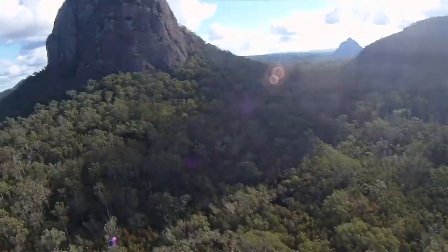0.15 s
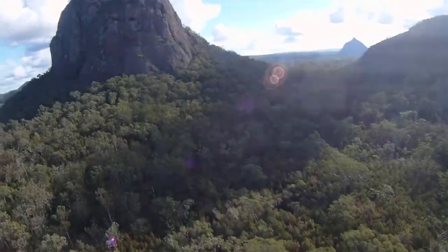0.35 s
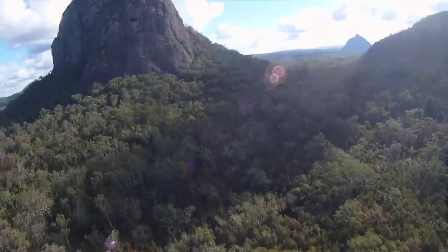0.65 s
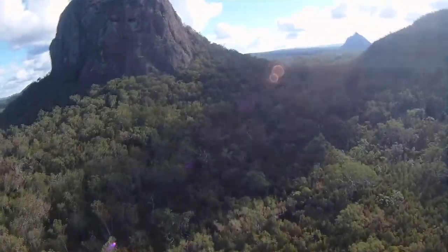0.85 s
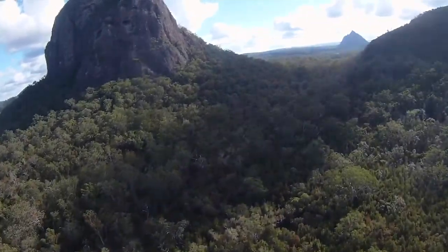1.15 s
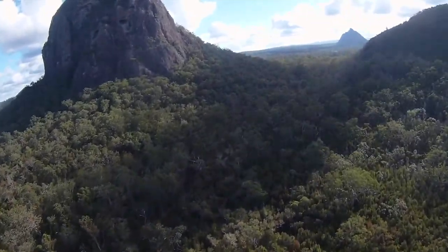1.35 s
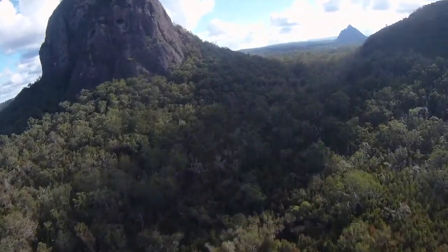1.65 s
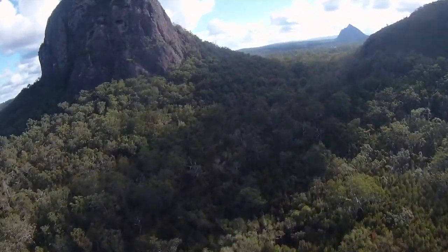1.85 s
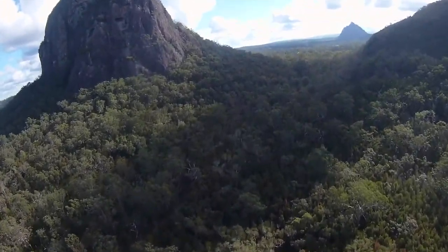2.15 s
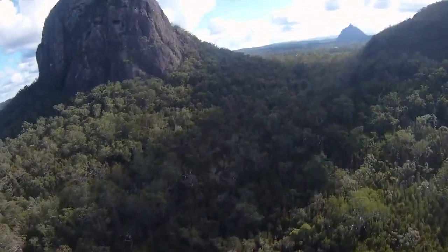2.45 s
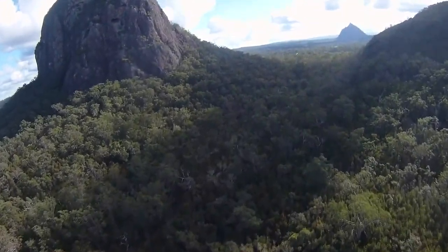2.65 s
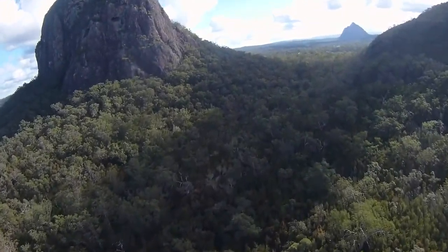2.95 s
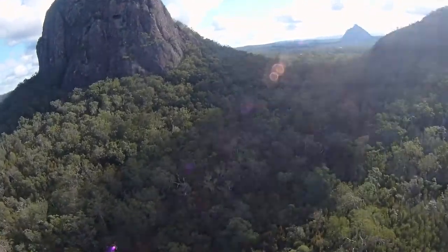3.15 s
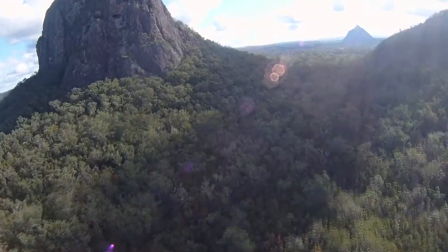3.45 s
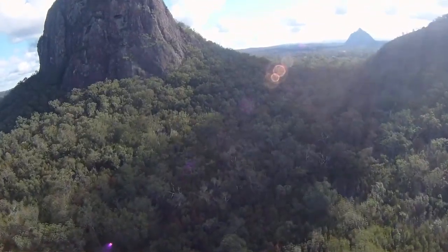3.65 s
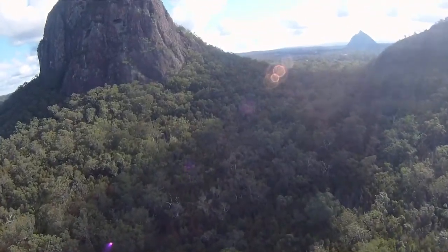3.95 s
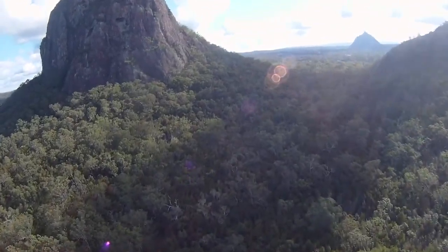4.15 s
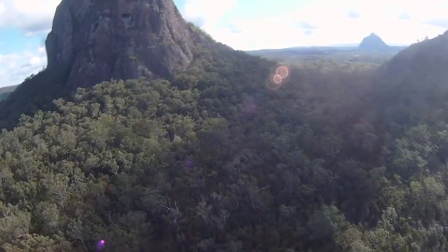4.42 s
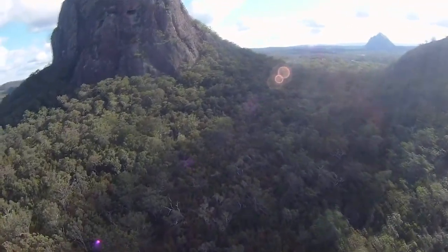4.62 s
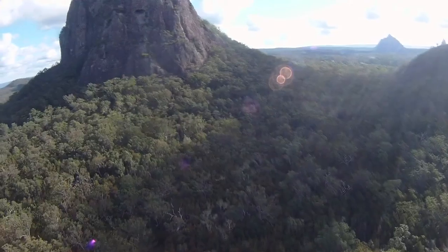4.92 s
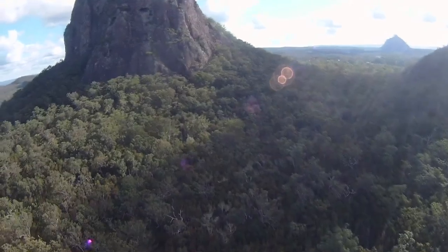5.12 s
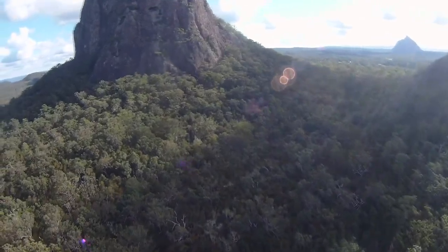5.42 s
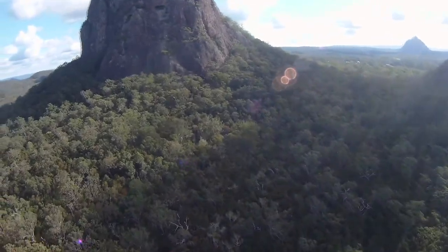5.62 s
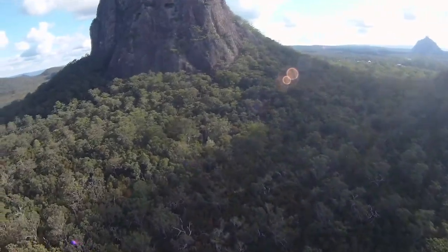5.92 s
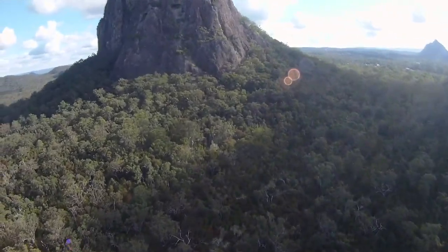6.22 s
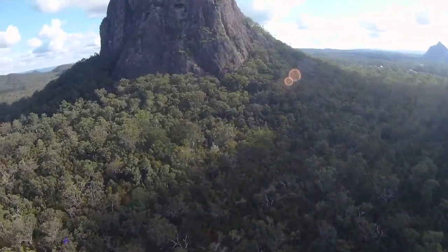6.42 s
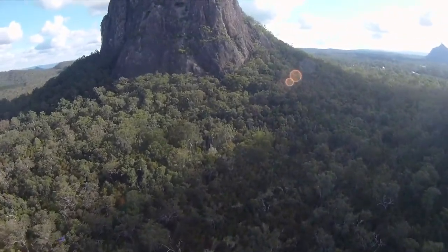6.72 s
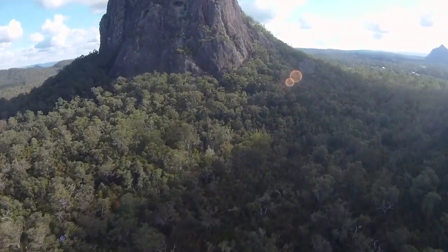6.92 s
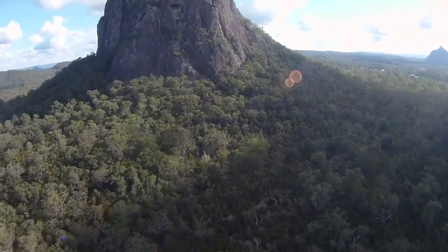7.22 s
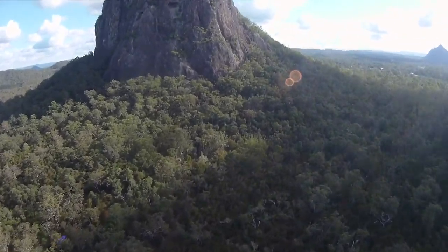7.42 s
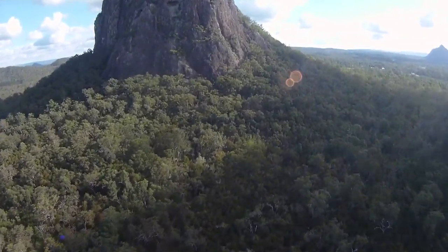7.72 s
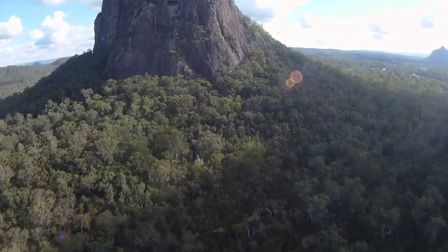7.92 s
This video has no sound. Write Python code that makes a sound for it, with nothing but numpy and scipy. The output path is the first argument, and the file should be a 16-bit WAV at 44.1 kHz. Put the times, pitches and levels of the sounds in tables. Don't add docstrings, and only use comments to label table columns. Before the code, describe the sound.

Heard from the aircraft itself, several slightly mistuned rotors hum thickly and waver without pause, wrapped in boxy growl, wind rumble and faint thin whistles.

```python
import sys
import numpy as np
from scipy import signal
from scipy.fft import rfft, irfft, next_fast_len
from scipy.io import wavfile
from scipy.ndimage import uniform_filter1d

SR = 44100
rng = np.random.default_rng(int(sys.argv[2]) if len(sys.argv) > 2 else 0)


def unload_audio(sound):
    columns = np.transpose(np.atleast_2d(sound))
    steps = np.round(np.clip(columns, -1, 1) * 32767)
    wavfile.write(sys.argv[1], SR, steps.astype(np.int16))


def gain_from_decibels(decibels):
    exponent = np.asarray(decibels, float) / 20
    return 10 ** exponent


N = 355887
TIME_S = np.arange(N) / SR


def rms_one(x):
    return x / np.sqrt(np.mean(x ** 2) + 1e-20)


def in_time(rows):
    start_s, *columns = np.transpose(rows)
    return [np.interp(TIME_S, start_s, column) for column in columns]


def phase_of(hz):
    return 2 * np.pi * np.cumsum(hz) / SR


def drift(rate):
    pole = np.exp(-80 * np.pi * rate / SR)
    noise = rng.standard_normal(N // 40 + 2002)
    slow = signal.lfilter([1], [1, -2 * pole, pole * pole], noise)[2000:]
    return np.interp(np.arange(N) / 40, np.arange(len(slow)), rms_one(slow))


def swells(rows, width_s):
    t = np.arange(0, N, 64) / SR
    db = sum(level_db * np.exp(-.5 * ((t - centre_s) / width_s) ** 2) for centre_s, level_db in rows)
    return np.interp(TIME_S, t, db)


def spectrum_gain(hz_offset_log, spectrum):
    hz, db = np.transpose(spectrum)
    return gain_from_decibels(np.interp(hz_offset_log, np.log(hz), db, left=-120, right=-120))


def coloured(x, spectrum, reference=None):
    size = next_fast_len(N)
    log_hz = np.log(np.arange(size // 2 + 1) * SR / size + 1)
    gain = spectrum_gain(log_hz, spectrum)
    scale = spectrum_gain(log_hz, reference or spectrum)
    return irfft(rfft(rms_one(x), size) * gain, size)[:N] / np.sqrt(np.mean(scale ** 2))


# start_s [s], first to fifth speed [turns per s]
NEAR_SPEEDS = [(0.0, 104.121, 103.653, 112.072, 107.02, 102.714),
               (0.47, 103.821, 104.185, 112.67, 105.39, 102.751),
               (0.95, 104.685, 104.106, 112.592, 108.604, 105.806),
               (1.42, 107.885, 107.047, 111.902, 110.497, 106.969),
               (1.9, 108.092, 108.946, 112.958, 111.492, 105.987),
               (2.37, 108.79, 109.642, 113.694, 110.26, 108.015),
               (2.85, 108.917, 109.418, 114.127, 109.79, 106.468),
               (3.32, 108.599, 107.68, 114.051, 110.108, 107.365),
               (3.8, 109.15, 110.447, 115.444, 111.512, 106.646),
               (4.27, 109.647, 110.388, 114.233, 114.747, 106.241),
               (4.75, 109.916, 108.352, 114.262, 113.744, 106.401),
               (5.22, 109.907, 109.022, 114.772, 113.455, 108.02),
               (5.7, 111.31, 111.021, 116.039, 112.189, 108.966),
               (6.17, 108.612, 110.534, 114.553, 113.175, 107.009),
               (6.65, 108.468, 107.394, 116.269, 112.237, 107.478),
               (7.12, 109.687, 110.408, 115.178, 110.672, 107.557),
               (7.6, 110.897, 110.804, 116.991, 113.959, 109.037),
               (8.07, 109.435, 109.111, 115.446, 110.31, 110.235)]
# start_s [s], speed [turns per s]
FAR_SPEED = [(0, 116), (.8, 116.6), (1.4, 117.8), (2.5, 119.1), (3.3, 118.4), (3.8, 120.3), (5.3, 120.1),
             (6.6, 118.8), (7.5, 120.1), (8.07, 119.8)]
START_ANGLES = [(0, 0), (.976, .494), (.239, .811), (.733, .689), (.402, .536), (0, 0)]


def rotor_angles():
    speeds = in_time(NEAR_SPEEDS) + in_time(FAR_SPEED)
    return [phase_of(turns) + 2 * np.pi * start for turns, (start, _) in zip(speeds, START_ANGLES)]


def hunting(angles, hunt):
    return [angle + phase_of(hunt * drift(7.64)) for angle in angles]


# shake_db [dB], blade_db [dB]
HUM_DB = [(-33.5, -10.5), (-31, -20.5), (-31, -23), (-29.5, -23.5), (-33.5, -26), (-37, -34)]
# centre_s [s], level_db [dB]
ROCKING = [(.3, -6), (.72, 4.5), (1.2, -3.5), (2.1, 2), (2.32, -7), (2.75, -5), (2.98, -9), (3.1, 2),
           (3.45, 7.5), (3.75, 4.5), (4.12, 5.5), (4.68, -9.5), (5.0, 1.5), (5.75, 5), (6.0, -5),
           (6.6, -0.5), (6.87, 3), (7.05, -7), (7.35, -2.5), (7.72, 3.5), (7.92, 0)]
# centre_s [s], level_db [dB]
WAKES = [(.19, -3.5), (.42, -2.5), (2.12, -4), (3.28, -7), (3.75, -2.5), (4.1, -6), (4.37, -5.5),
         (4.89, -8.5), (4.94, -5.5), (5.55, -4), (5.88, -5), (6.17, 0.5), (6.23, -5.5), (7.11, -6),
         (8.05, -5)]


def hum(angles, flutter_db):
    rocking = gain_from_decibels(swells(ROCKING, width_s=0.047))
    wake = gain_from_decibels(swells(WAKES, width_s=0.0078))
    out = np.zeros(N)
    for angle, (_, heavy), (shake_db, blade_db) in zip(angles, START_ANGLES, HUM_DB):
        shake = gain_from_decibels(shake_db) * rocking * np.cos(angle + 2 * np.pi * heavy)
        blade = gain_from_decibels(blade_db) * wake * np.cos(2 * angle)
        out += np.sqrt(2) * gain_from_decibels(flutter_db * drift(4.5)) * (shake + blade)
    return out


# centre_s [s], level_db [dB]
GUSTS = [(.21, 4), (.48, 0), (.85, 1.5), (1.19, 2.5), (1.53, 2), (2.13, 4), (2.75, 3.5), (3.23, 4.5),
         (3.82, 4), (4.24, 3.5), (4.58, 3), (5.04, 3), (5.54, 3), (5.97, 2.5), (6.41, 3.5), (6.87, 4.5),
         (7.3, 3), (7.75, 3), (8.07, 2)]
# centre_s [s], level_db [dB]
SHUDDERS = [(.12, -1), (1.05, 1), (1.6, 6.5), (2.9, 5), (3.1, 7), (3.3, -2), (4.1, 6), (4.32, 4.5),
            (5.45, 5), (6.0, 0.5), (6.65, 6.5), (7.15, 1.5), (7.5, 5), (7.68, 4.5), (8.0, 8.5)]


def loading():
    gust_db = swells(GUSTS, width_s=0.17)
    drone_db = -0.4 + 0.48 * gust_db
    growl_db = -3.0 + 0.84 * gust_db
    third_db = -1 + swells(SHUDDERS, width_s=0.062)
    return drone_db, growl_db, third_db


# even_db [dB], odd_db [dB], upper_db from the sixth on [dB], pole_whine_db [dB]
ROTOR_DB = [(2.5, -4, -5.5, -72.5), (-1, -1, -4, -86), (-3, -3, 2.5, -83), (0.5, 0, -2, -87.5),
            (-11.5, -12, 1.5, -84), (-9, -10.5, 2, -72.5)]
# multiple [count], level_db [dB]
OVERTONES = [(3, -38.5), (4, -46), (5, -59), (6, -45.5), (7, -47), (8, -47), (9, -45), (10, -46.5),
             (11, -51.5), (12, -41), (13, -44.5), (14, -45), (15, -47), (16, -49), (17, -59), (22, -50),
             (23, -50), (24, -54.5), (25, -52.5), (26, -57.5)]


def overtones(angles, flutter_db):
    pole_steps = 42
    drone_db, growl_db, third_db = loading()
    flutters = [gain_from_decibels(flutter_db * drift(5)).astype(np.float32) for _ in range(12)]
    third, plain, drone, growl = ranges = np.zeros((4, N))
    for k, (angle, (even_db, odd_db, upper_db, pole_db)) in enumerate(zip(angles, ROTOR_DB)):
        turn = (angle % (2 * np.pi)).astype(np.float32)
        pole_whine = np.cos(pole_steps * turn) + .3 * np.cos(2 * pole_steps * turn)
        plain += gain_from_decibels(pole_db) * flutters[k] ** .5 * pole_whine
        for multiple, db in OVERTONES:
            step = round(multiple)
            steadiness = .6 if step < 5 else 1
            flutter = np.roll(flutters[(5 * k + step) % 12], 20000 * k) ** steadiness
            level_db = db + (odd_db if step % 2 else even_db) + upper_db * (step >= 6)
            tone = np.cos(step * turn + rng.uniform(0, 7))
            ranges[np.searchsorted([3, 7, 11], step)] += gain_from_decibels(level_db) * flutter * tone
    loaded = gain_from_decibels(third_db) * third + plain + gain_from_decibels(drone_db) * drone + gain_from_decibels(growl_db) * growl
    return np.sqrt(2) * loaded


# frequency_hz [Hz], level_db [dB per Hz]
DRONE = [(440, -48.5), (510, -31), (600, -24.5), (680, -4.5), (740, -11.5), (830, -16.5), (920, -12),
         (960, -14), (1040, -3.5), (1150, -5.5), (1240, -11.5), (1300, -39)]
# frequency_hz [Hz], level_db [dB per Hz]
GROWL = [(1180, -41), (1240, -14.5), (1320, -9.5), (1440, -1), (1750, -5), (1970, -13.5), (2280, -18),
         (2370, -22.5), (2520, -9), (2850, -14.5), (3050, -24), (3250, -19.5), (3800, -27), (4050, -34),
         (4700, -58)]
# frequency_hz [Hz], level_db [dB per Hz]
AIR = [(3600, -22), (4100, -2), (4750, -6), (5600, -5.5), (6300, -10), (6850, -8), (7700, -14.5),
       (8600, -12), (9150, -8), (9900, -18.5), (10700, -15), (12000, -11), (14600, -13), (15200, -19.5),
       (15300, -64.5)]


def hiss(angles, low_chop, high_chop):
    drone_db, growl_db, _ = loading()
    passing = rms_one(sum(np.cos(2 * angle) + 0.32 * np.cos(angle) for angle in angles[:4]))
    eddies = rng.standard_normal(N) * gain_from_decibels(low_chop * passing + 2.0 * drift(19))
    low = gain_from_decibels(drone_db) * coloured(eddies, DRONE, GROWL)
    middle = gain_from_decibels(growl_db) * coloured(eddies, GROWL)
    fine_eddies = rng.standard_normal(N) * gain_from_decibels(high_chop * passing + 1.0 * drift(14))
    thin = coloured(fine_eddies, AIR)
    return gain_from_decibels(-27.5) * (low + middle) + gain_from_decibels(-54.36 + 0.32 * growl_db) * thin


# centre_hz [Hz], width_hz [Hz], depth_db [dB]
HOUSING = [(310, 10, -4), (418, 12, 7), (738, 18, -5), (1240, 25, -7), (1435, 30, 4), (1495, 20, -3),
           (2368, 30, -6)]


def housing(x):
    size = next_fast_len(N)
    hz = np.arange(size // 2 + 1) * SR / size
    db = sum(depth_db / (1 + ((hz - centre_hz) / width_hz) ** 2) for centre_hz, width_hz, depth_db in HOUSING)
    return irfft(rfft(x, size) * gain_from_decibels(db), size)[:N]


# frequency_hz [Hz], level_db [dB per Hz]
RUMBLE = [(15, -5), (22, -1.5), (30, -5), (60, -10), (90, -1.5), (170, 3), (280, -3.5), (390, -13),
          (520, -18.5), (700, -22.5)]


def rumble():
    return gain_from_decibels(-36 + 1.6 * drift(5.6)) * coloured(rng.standard_normal(N), RUMBLE)


# pitch_hz [Hz], level_db [dB]
SWITCHING = [(8080, -68.5), (8102, -70), (8301, -76.5), (8323, -79.5), (8543, -84), (8764, -77),
             (8985, -74)]


def controller_whine():
    out = np.zeros(N)
    for pitch_hz, level_db in SWITCHING:
        level = gain_from_decibels(level_db + 3.4 * drift(3))
        out += np.sqrt(2) * level * np.sin(phase_of(pitch_hz + 3.0 * drift(6)))
    return out


# start_s [s], pitch_hz [Hz]
WANDER = [
    (.06, 5920),
    (.15, 5850),
    (.29, 5950),
    (.4, 5825),
    (.48, 5803),
    (.6, 5848),
    (.67, 5905),
    (.79, 5835),
    (.88, 5925),
]


def wandering_whistle():
    hz = uniform_filter1d(in_time(WANDER)[0], size=1500)
    db = -56 - .13 * np.abs(hz - 5815)
    return np.sqrt(2) * gain_from_decibels(db) * np.cos(phase_of(hz)) * (TIME_S < WANDER[-1][0])


# start_s [s], pitch_hz [Hz], level_db [dB]
LOW_WHISTLES = [
    [(2.85, 5560, -68), (3.31, 5620, -71.5), (3.554, 5640, -92), (3.648, 5630, -58.5), (3.75, 5560, -80)],
    [(4.25, 5604, -66), (4.406, 5667, -75), (4.546, 5630, -66), (4.7, 5560, -80)],
    [(5.05, 5604, -70), (5.378, 5530, -69), (5.442, 5633, -93), (5.504, 5609, -70), (6.012, 5500, -67),
     (6.05, 5649, -74)],
]


def winding_whistles():
    out = np.zeros(N)
    for rows in LOW_WHISTLES:
        hz, db = in_time(rows)
        sounding = (TIME_S > rows[0][0]) & (TIME_S < rows[-1][0])
        gate = uniform_filter1d(1. * sounding, size=2000)
        out += gate * np.sqrt(2) * gain_from_decibels(db) * np.cos(phase_of(hz))
    return out


def tick():
    t = TIME_S - 4.899
    snap = np.exp(-np.abs(t) / 9e-5) * (t > 0)
    push = .5 * np.exp(-np.abs(t) / 2.5e-4) + .15 * np.exp(-np.abs(t) / 1.5e-3)
    return gain_from_decibels(-17.5) * (snap - push * (t <= 0))


# frequency_hz [Hz], level_db [dB per Hz]
SIDE_SPECTRUM = [(24, -29.5), (40, -3), (157, -1), (226, -21.5), (290, -8), (352, 1), (900, -14.5),
                 (1170, -42), (1980, -44.5), (2700, -32), (3600, -44)]


def channel_noise():
    levels_db = 9.0 * rng.standard_normal((2, N // 1024 + 1)).clip(-3, 1.2)
    frames = np.repeat(gain_from_decibels(levels_db), 1024, axis=1)[:, :N]
    top, bass = rng.standard_normal((2, N)) * frames
    own = gain_from_decibels(-64.5) * coloured(top, AIR) + gain_from_decibels(-52.5) * coloured(bass, SIDE_SPECTRUM)
    return own * [[1], [-1]]


def preamp_hiss():
    return gain_from_decibels(-63) * coloured(rng.standard_normal(N), AIR)


def gain_control(x):
    level_db = 10 * np.log10(uniform_filter1d(x ** 2, size=840) + 1e-9) + 12.43
    pole = np.exp(-1 / (.013 * SR))
    return gain_from_decibels(-.41 * signal.lfilter([1 - pole], [1, -pole], level_db))


def scene():
    angles = rotor_angles()
    hunted = hunting(angles, hunt=.3)
    motors = hum(angles, flutter_db=-0.16) + overtones(hunted, flutter_db=4.5)
    enclosed = housing(motors + hiss(hunted, low_chop=0.93, high_chop=1.2))
    whistles = controller_whine() + wandering_whistle() + winding_whistles()
    mono = enclosed + rumble() + whistles + tick()
    return np.array([mono, mono])


def band_limit(x):
    return signal.sosfilt(signal.butter(12, 15710, fs=SR, output="sos"), x)


def record(dry):
    mix = dry * gain_control(dry[0]) + preamp_hiss() + channel_noise()
    from_end = np.minimum(np.arange(N), np.arange(N)[::-1])
    edges = np.minimum(1, from_end / 150)
    return band_limit(mix * edges)


dry = scene()
out = record(dry)
unload_audio(out)
```